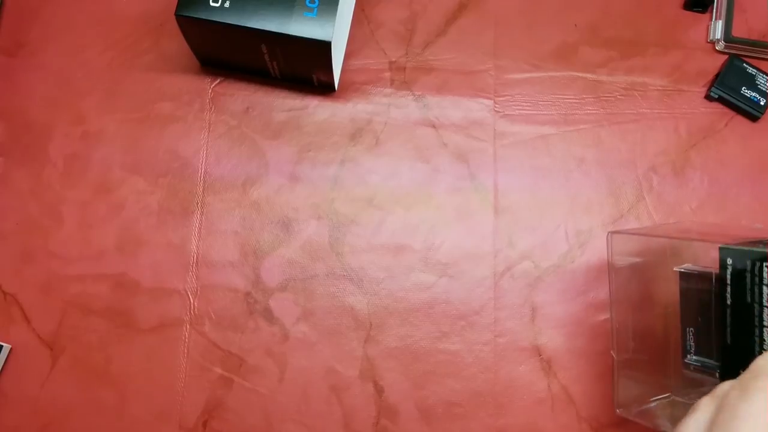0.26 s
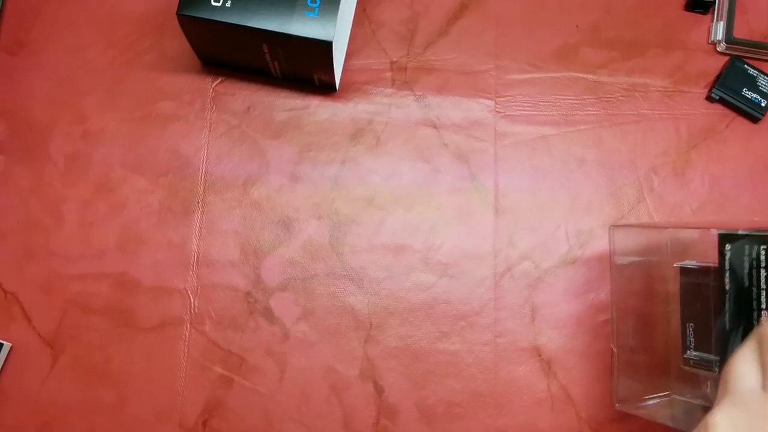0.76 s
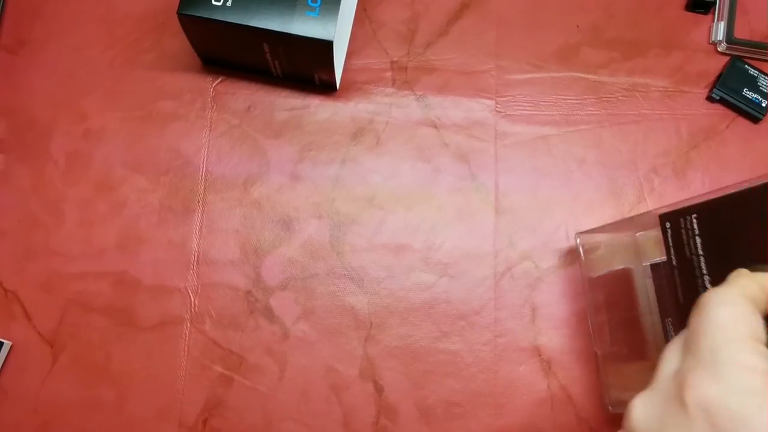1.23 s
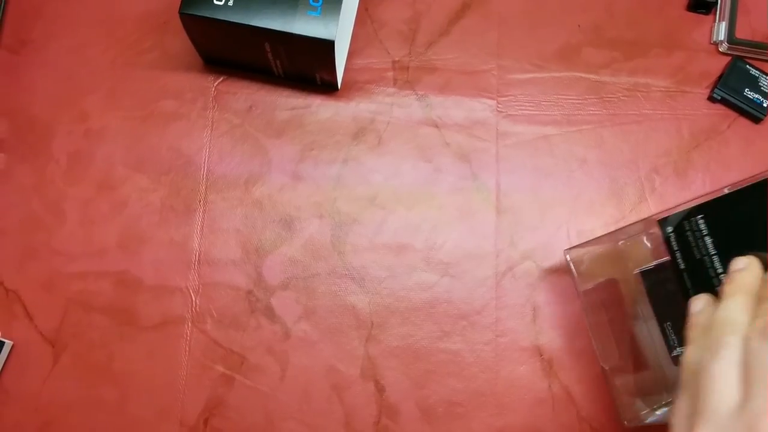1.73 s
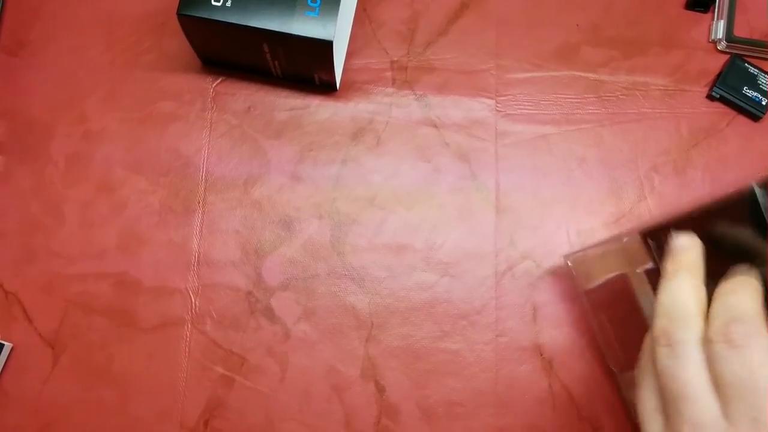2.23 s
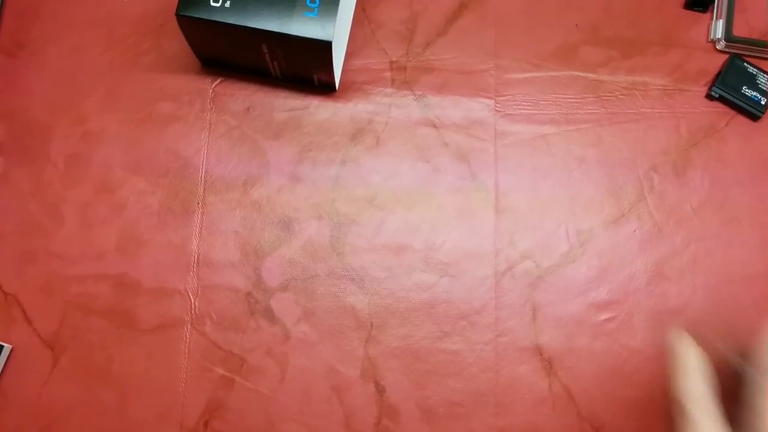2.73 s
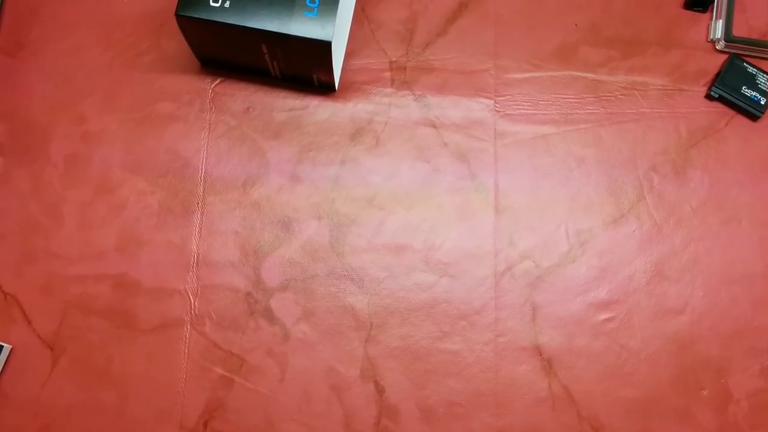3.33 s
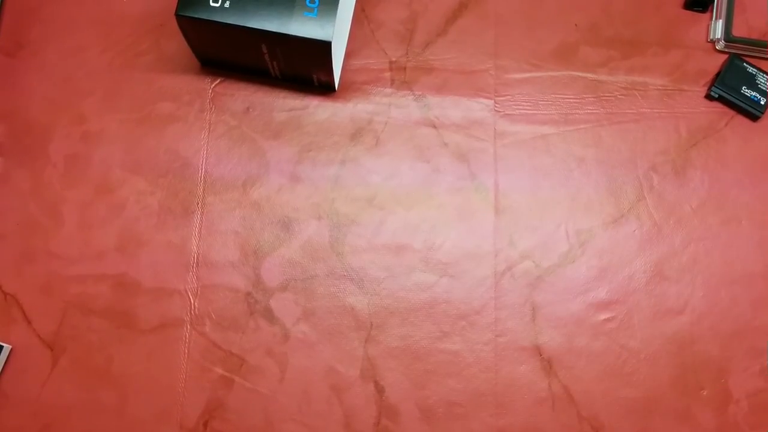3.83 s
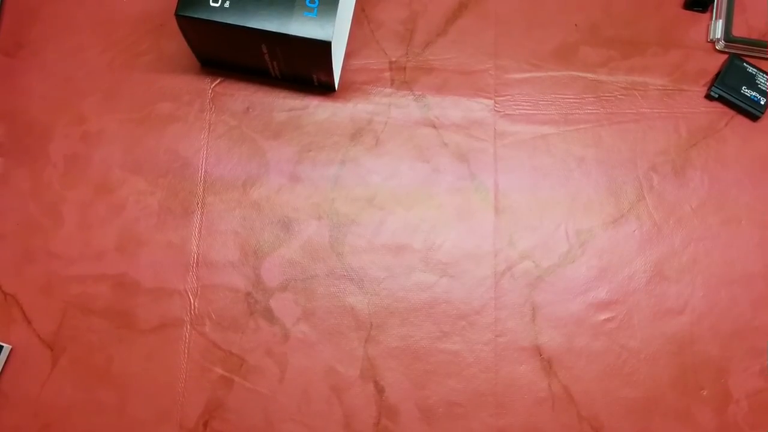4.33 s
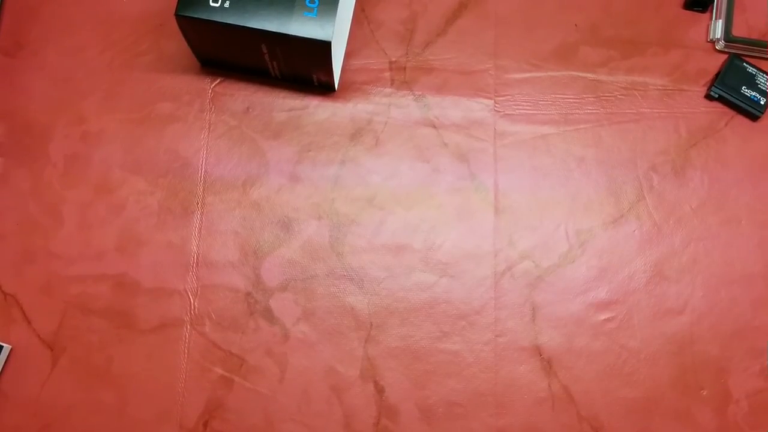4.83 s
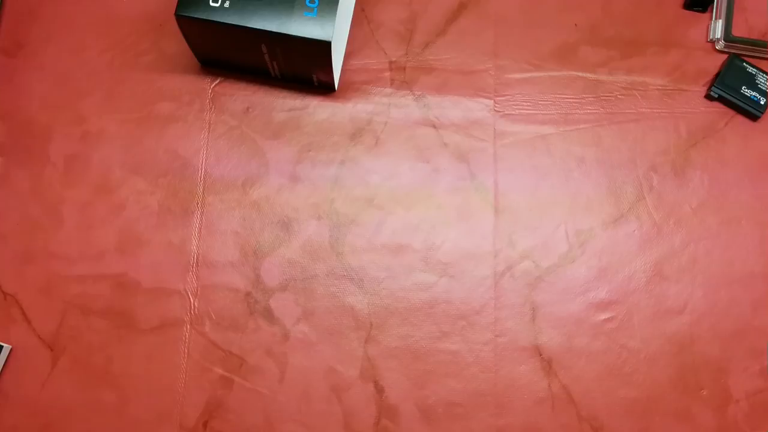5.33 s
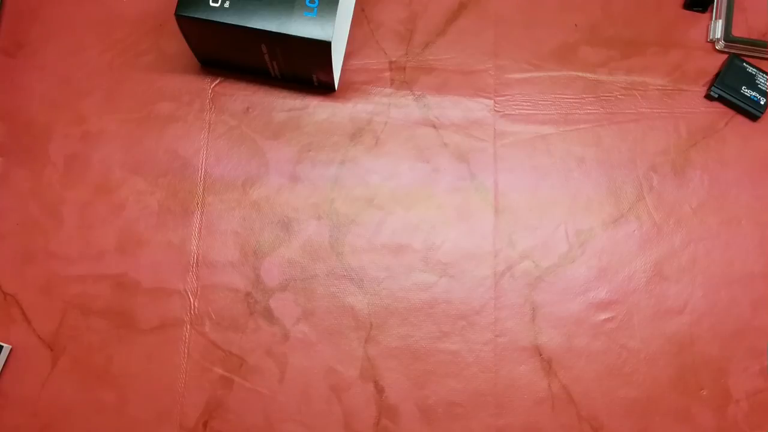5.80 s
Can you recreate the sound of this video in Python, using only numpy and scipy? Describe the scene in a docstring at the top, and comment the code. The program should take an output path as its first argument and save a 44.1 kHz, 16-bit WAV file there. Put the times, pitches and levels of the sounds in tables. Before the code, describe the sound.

Hands pry at a stiff, hollow clear plastic box on a table. Faint rustles and small clicks come first, with a soft table thump, then light crackling. After a sharp knock the snaps grow brighter, bursting into a loud rapid cluster of cracks past the middle. Hollow knocks and small crackles follow. Close microphone, small dry room, quiet tails cut down.

```python
"""Brittle snaps and hollow knocks throughout, over faint rustling: hands pry at a stiff clear plastic box.
Walls buckle and slip in short bursts of tiny impulses that ring tuned resonators, under bright cracks of noise.
The table booms softly when box or hand touches it; fingers rustle as clumped noise, now and then singing.
Decaying noise makes the echo of a small room, and a low murmur fills it.
The recorder's noise gate turns quiet tails down and its peaks are rounded."""
import sys
import numpy as np
from scipy import signal
from scipy.fft import rfft, irfft, next_fast_len
from scipy.io import wavfile
from scipy.ndimage import uniform_filter1d

SR = 44100
rng = np.random.default_rng(int(sys.argv[2]) if len(sys.argv) > 2 else 0)


def how_loud(loudness_db):
    """Turn decibels into a plain amplitude multiplier (0 dB gives 1, 20 dB gives 10)."""
    steps = np.asarray(loudness_db, float) / 20
    return 10 ** steps


def inscribe(sig):
    """Save sig as 16-bit PCM at rate SR to the path in sys.argv[1].

    A 1-D sig is mono; a 2-D sig holds one channel per row.
    Samples are clipped to [-1, 1] before scaling.
    """
    pcm = np.round(np.clip(np.atleast_2d(sig).T, -1, 1) * 32767)
    wavfile.write(sys.argv[1], SR, pcm.astype(np.int16))


N = 267201

# room murmur: (frequency [Hz], relative density [dB per Hz])
MURMUR_COLOUR = [(20, -9.5), (35, -5.5), (60, -5), (120, -1.5), (170, -11), (300, -1), (900, -7.5),
                 (2800, -22.5), (6000, -33.5), (12000, -59.5)]
# decay of the room echo: (frequency [Hz], t60 [s])
ROOM_DECAY = [(150, 0.12), (500, 0.21), (2000, 0.19), (6000, 0.15), (14000, 0.08)]
# box or hand touching the table: (time [s], level [dB])
TABLE_THUMPS = [(0.039, -34), (0.48, -36), (0.728, -53), (0.763, -54.5), (0.901, -42), (0.935, -47),
                (1.005, -47.5), (1.329, -52), (1.49, -18.5), (1.547, -34.5), (1.666, -44), (1.769, -48),
                (1.95, -39), (2.026, -36.5), (2.067, -41.5), (2.265, -32), (2.387, -38.5), (2.544, -41.5),
                (2.683, -48), (3.178, -48), (3.421, -51), (4.595, -26), (5.038, -40), (5.237, -36),
                (5.298, -35.5), (5.348, -42), (5.435, -50), (5.6, -54), (5.67, -49), (5.834, -33),
                (5.9, -48), (6.02, -34.5)]
# modes of the table top: (frequency [Hz], level [dB], t60 [s])
TABLE_MODES = [(73.6, -18.5, 0.041), (91, -12.5, .1), (116.3, 4.5, .1), (155, -20.5, 0.038)]
# fingers shifting on the plastic: (time [s], level [dB])
FINGER_LEVEL = [(0, -57), (.2, -67), (.55, -56), (.9, -54), (1.3, -55), (1.5, -64), (1.9, -57), (2.4, -55),
                (2.85, -65), (3.1, -62), (3.3, -55), (3.75, -58), (4.1, -64), (4.4, -56), (4.9, -57),
                (5.2, -62), (5.5, -50), (5.75, -62), (6.06, -46)]
# colour of the rubbing: (frequency [Hz], relative density [dB per Hz])
RUB_COLOUR = [(88, -34.5), (150, -6.5), (345, 5), (920, -6), (1730, -14), (2110, -13.5), (2620, -13),
              (4470, -30), (8000, -35), (10400, -66), (17600, -120)]
# buckles and slips of the box:
# (time [s], centre of the hollow ring [Hz], hollow level [dB], wall level [dB], crack level [dB])
BOX_SNAPS = [(0.033, 376, -43, -55, -85), (0.095, 740, -55, -50, -29), (0.478, 860, -33, -30, -63),
             (0.58, 730, -84, -57, -74), (0.603, 530, -69, -55, -98), (0.754, 320, -54, -53, -82),
             (0.768, 516, -48, -72, -90), (0.889, 440, -49, -77, -84), (0.93, 420, -48, -59, -82),
             (1.003, 280, -35, -67, -94), (1.037, 490, -45, -59, -95), (1.067, 510, -73, -54, -72),
             (1.247, 530, -62, -47, -67), (1.265, 530, -61, -51, -67), (1.486, 363, -26, -45, -89),
             (1.558, 444, -36, -45, -91), (1.665, 713, -24, -26, -50), (1.675, 775, -28, -23, -38),
             (1.782, 573, -50, -55, -67), (1.817, 660, -30, -30, -70), (1.941, 665, -38, -36, -70),
             (1.974, 485, -34, -35, -74), (1.988, 673, -52, -18, -18), (2.005, 560, -29, -36, -54),
             (2.03, 600, -23, -25, -32), (2.059, 716, -37, -50, -71), (2.178, 680, -41, -44, -76),
             (2.215, 770, -53, -51, -76), (2.26, 600, -27, -27, -40), (2.304, 680, -35, -42, -66),
             (2.363, 560, -32, -31, -67), (2.385, 460, -47, -46, -73), (2.422, 840, -34, -31, -48),
             (2.529, 475, -45, -47, -71), (2.549, 555, -30, -43, -82), (2.673, 604, -44, -54, -86),
             (2.929, 774, -45, -38, -53), (2.97, 660, -46, -32, -53), (3.176, 385, -12, -16, -24),
             (3.195, 410, -40, -41, -63), (3.224, 500, -34, -62, -79), (3.316, 384, -48, -53, -67),
             (3.41, 425, -41, -52, -75), (3.426, 410, -28, -28, -47), (3.445, 430, -26, -41, -71),
             (3.473, 580, -29, -36, -73), (3.489, 480, -46, -39, -67), (3.523, 760, -63, -26, -54),
             (3.562, 480, -56, -55, -60), (3.595, 316, -42, -59, -64), (3.716, 485, -53, -51, -64),
             (3.747, 440, -56, -51, -68), (3.865, 504, -34, -35, -50), (3.907, 477, -45, -54, -69),
             (3.944, 610, -33, -31, -49), (3.966, 440, -36, -14, -28), (3.985, 627, -46, -30, -46),
             (4.175, 477, -51, -37, -61), (4.187, 584, -36, -31, -45), (4.198, 880, -37, -28, -39),
             (4.231, 680, -42, -22, -31), (4.26, 570, -12, -21, -26), (4.29, 430, -46, -38, -65),
             (4.32, 620, -61, -41, -59), (4.474, 664, -57, -33, -52), (4.489, 693, -26, -21, -30),
             (4.511, 550, -34, -31, -58), (4.535, 740, -50, -47, -73), (4.596, 343, 1, -6, -8),
             (4.605, 380, -14, -15, -22), (4.621, 337, -41, -13, -16), (4.636, 470, -5, -5, -12),
             (4.658, 340, 0, -6, -6), (4.682, 399, -12, -18, -35), (4.708, 422, -19, -21, -29),
             (4.752, 635, -35, -23, -49), (4.773, 570, -30, -29, -52), (4.788, 376, -42, -33, -50),
             (4.816, 560, -35, -31, -52), (4.866, 698, -45, -33, -69), (4.957, 670, -56, -49, -78),
             (5.033, 360, -17, -23, -73), (5.05, 383, -19, -40, -64), (5.094, 549, -16, -26, -61),
             (5.135, 613, -57, -49, -81), (5.235, 634, -20, -19, -48), (5.248, 311, -12, -20, -68),
             (5.271, 700, -16, -25, -64), (5.28, 750, -15, -11, -48), (5.29, 740, -16, -38, -47),
             (5.31, 384, -17, -28, -43), (5.323, 382, -20, -27, -53), (5.336, 510, -22, -27, -41),
             (5.355, 389, -42, -41, -52), (5.384, 480, -46, -44, -67), (5.419, 580, -41, -60, -77),
             (5.525, 360, -33, -34, -73), (5.556, 299, -29, -35, -73), (5.596, 337, -34, -51, -77),
             (5.667, 620, -34, -30, -67), (5.755, 650, -57, -47, -80), (5.813, 630, -33, -33, -60),
             (5.828, 360, -26, -26, -26), (5.848, 410, -32, -22, -30), (5.883, 363, -25, -19, -23),
             (5.895, 367, -45, -22, -27), (5.937, 437, -44, -36, -54), (5.961, 700, -41, -33, -45),
             (5.973, 720, -38, -30, -34), (6.012, 514, -27, -28, -41), (6.032, 630, -32, -35, -65)]
# the box as a hollow body: (frequency [Hz], level [dB], t60 [s])
HOLLOW_MODES = [(290.3, -16.5, 0.091), (334, 0, 0.093), (340.8, 0, 0.065), (410, -2, 0.034),
                (449, -10, 0.043), (530, -0.5, 0.027), (617.4, 4.1, .065), (680, 2, 0.04), (802, 2.8, .06),
                (904, 5, 0.054)]
# damped hollow modes that blur together: (band centre [Hz], level [dB])
BODY_BANDS = [(300, -0.5), (450, -3.5), (680, -2.5)]
# bending modes of the walls: (frequency [Hz], level [dB], t60 [s])
WALL_MODES = [(958.6, 1.5, 0.061), (1066, -4.5, .055), (1307, -3.55, .055), (1400, -2.5, 0.037),
              (1450, -1.5, 0.026), (1681, 1.5, 0.055), (1870, -0.5, 0.058), (1990, 0.5, 0.034),
              (2300, 2.5, .045), (2590, -2.5, .045), (2944, -4.5, 0.028), (3170, -6.5, 0.054),
              (3380, -7, 0.051), (3700, -20.5, 0.012), (4160, -10.5, 0.071), (4547, -11, 0.081)]
# wall modes too dense to tell apart: (band centre [Hz], level [dB])
SHIMMER_BANDS = [(1000, -3), (1500, -1), (2200, -0.5), (3200, 1.5), (4500, -2)]
# colour of the bare crack: (frequency [Hz], relative density [dB per Hz])
CRACK_COLOUR = [(2500, -2.5), (4000, 9), (5500, 4.65), (7500, 1.5), (10000, -7.5), (13000, -15),
                (16000, -31)]


def rms_one(x):
    """Scale to rms 1."""
    return x / np.sqrt(np.mean(x ** 2) + 1e-20)


def at_hz(points, hz):
    """Read a table on a log-frequency axis."""
    points = np.array(points)
    return np.interp(np.log(hz), np.log(points[:, 0]), points[:, 1])


def coloured(x, spectrum):
    """Give a signal the colour of a spectrum; rms 1."""
    size = next_fast_len(len(x))
    hz = np.maximum(np.fft.rfftfreq(size, 1 / SR), 1)
    tinted = rfft(x, size) * how_loud(at_hz(spectrum, hz))
    return rms_one(irfft(tinted, size)[:len(x)])


def between(x, low_hz, high_hz):
    """Steep band-pass."""
    return signal.sosfilt(signal.butter(3, [low_hz, high_hz], "band", fs=SR, output="sos"), x)


def ring(force, hz, t60):
    """A damped resonator: a unit click sets a sine of height 1 ringing."""
    radius = how_loud(-60 / (t60 * SR))
    turn = 2 * np.pi * hz / SR
    # the tiny constant keeps the filter out of denormals
    return signal.lfilter([0, np.sin(turn)], [1, -2 * radius * np.cos(turn), radius ** 2], force + 1e-18)


def lay(times, shapes):
    """Place one short shape at each time."""
    out = np.zeros(N + shapes.shape[1])
    for time, shape in zip(times, shapes):
        at = round(time * SR)
        out[at:at + len(shape)] += shape
    return out[:N]


def grains(shape, spread_db):
    """Dense tiny slips: random sign, a few far larger than the rest."""
    return rng.standard_normal(shape) * how_loud(spread_db * np.minimum(rng.exponential(1, shape), 5))


def struck(modes, times, forces, db, spread_db):
    """Every force drives every mode, with a strength and sign of its own; db is events x modes."""
    shape = len(times), len(modes)
    strength = how_loud(np.array(modes)[:, 1] + db + spread_db * rng.standard_normal(shape))
    share = strength * rng.choice([-1, 1], shape)
    out = np.zeros(N)
    for k, (hz, _, t60) in enumerate(modes):
        out += ring(lay(times, forces * share[:, [k]]), hz, t60)
    return out


def swell(t, length, fade_s):
    """The burst's rise and fall, prolonged by a fading ring; height 1."""
    burst = t / length * np.exp(-t / length)
    shape = signal.lfilter([1], [1, -np.exp(-1 / (fade_s * SR))], burst)
    return shape / shape.max(axis=1, keepdims=True)


def grit(ticks_per_s, tick_s, steady):
    """Steady noise plus uneven ticks of noise, each dying fast."""
    ticks = (rng.random(N) < ticks_per_s / SR) * how_loud(4.8 * rng.standard_normal(N))
    flare = signal.lfilter([1], [1, -np.exp(-1 / (tick_s * SR))], ticks)
    return rng.standard_normal(N) * (steady + flare)


def blurred(bands, times, db, shapes):
    """Dense modes heard as bands of grit, each played by every burst; db is events x bands."""
    rough = grit(ticks_per_s=450.0, tick_s=0.0013, steady=1.4)
    gains = how_loud(np.array(bands)[:, 1] + db + 1.8 * rng.standard_normal((len(times), len(bands))))
    out = np.zeros(N)
    for k, (hz, _) in enumerate(bands):
        out += rms_one(between(rough, hz / 1.235, hz * 1.231)) * lay(times, gains[:, [k]] * shapes)
    return out


def murmur(level_db=-65.5):
    """Steady noise in the colour of the room's air."""
    return how_loud(level_db) * coloured(rng.standard_normal(N), MURMUR_COLOUR)


def room(x, onset_s=0.0016):
    """The echo is noise that fades in fast and dies band by band; its energy is 1."""
    t = np.arange(SR // 2) / SR
    echo = np.zeros(len(t))
    edges = 100 * 2 ** np.arange(0, 7.6, .5)   # half octaves [Hz]
    for low, high in zip(edges, edges[1:]):
        band_pass = signal.butter(2, [low, high], "band", fs=SR, output="sos")
        band = signal.sosfilt(band_pass, rng.standard_normal(len(t)))
        echo += band * how_loud(-60 * t / at_hz(ROOM_DECAY, np.sqrt(low * high)))
    echo *= 1 - np.exp(-(t / onset_s) ** 2)
    return signal.fftconvolve(x, echo / np.sqrt(np.sum(echo ** 2)))[:N]


def table(contact_s=0.0016):
    """A soft push sets the modes of the table top booming."""
    times, db = np.transpose(TABLE_THUMPS)
    t = np.arange(1000) / SR
    push = t * np.exp(-t / contact_s * np.e)
    pushes = np.tile(push / push.sum(), (len(times), 1))
    boom = struck(TABLE_MODES, times, pushes, db[:, None] + 0.5, spread_db=1.5)
    return between(boom, 55, 600)


def settling(below_wall_db=19.5, flare_s=.004, settle_s=.026):
    """Level of the walls' creaking, which flares with each snap and dies after it."""
    times, _, _, wall_db, _ = np.transpose(BOX_SNAPS)
    lead_s = .05
    t = np.arange(SR // 2) / SR - lead_s
    shape = np.where(t < 0, np.exp(t / flare_s), np.exp(-t / settle_s))
    return lay(np.maximum(times - lead_s, 0), how_loud(wall_db - below_wall_db)[:, None] * shape)


def humming(per_mode_per_s=3.5, swell_s=.025):
    """Now and then the rub makes one mode of the box sing briefly; rms 1."""
    out = np.zeros(N)
    fall = np.exp(-1 / (swell_s * SR))
    for hz, _, t60 in HOLLOW_MODES + WALL_MODES[:13]:
        starts = (rng.random(N) < per_mode_per_s / SR) * how_loud(3.0 * rng.standard_normal(N))
        swells = signal.lfilter([1], [1, -2 * fall, fall ** 2], starts + 1e-18)
        song = rms_one(ring(swells * rng.standard_normal(N), hz, t60))
        out += how_loud(at_hz(RUB_COLOUR, hz) / 2) * song
    return rms_one(out)


def rustle(clumps_per_s=80.0, clump_s=0.014, rub_db=-3.5, hum_db=-5.0):
    """Fingers on plastic: faint slips in small clumps over a steady rub, with singing modes."""
    starts = (rng.random(N) < clumps_per_s / SR) * how_loud(2 * rng.standard_normal(N))
    fall = np.exp(-1 / (clump_s * SR))
    rise_and_fall = signal.lfilter([(1 - fall) ** 2], [1, -2 * fall, fall ** 2], starts)
    clumps = .9 + clump_s * SR * rise_and_fall
    rub = rms_one(clumps) * coloured(grains(N, spread_db=2.0), RUB_COLOUR)
    times, db = np.transpose(FINGER_LEVEL)
    fingers = how_loud(np.interp(np.arange(N) / SR, times, db))
    return (how_loud(rub_db) * fingers + settling()) * rub + how_loud(hum_db) * fingers * humming()


def snaps_and_afterslips(count=2, gap_scale_s=.011, loss_db=19.0, fade_db_per_s=300.0, duller_db=10.0):
    """Every snap leaves strain that lets go in a few weaker, duller slips; same columns as the snaps."""
    rows = np.array(BOX_SNAPS)
    luck = rng.exponential(1, (len(rows), 2 * count))
    delay = np.cumsum(gap_scale_s * (.3 + luck[:, :count]), axis=1).ravel()
    lucky_db = 3.0 * np.minimum(luck[:, count:].ravel(), 3)
    change_db = lucky_db - loss_db - fade_db_per_s * delay
    changes = np.transpose([delay, np.zeros_like(delay), change_db, change_db, change_db - duller_db])
    after = np.repeat(rows, count, axis=0) + changes
    after[:, 0] = np.minimum(after[:, 0], (N - 1) / SR)
    return np.vstack([rows, after])


def burst_length(hollow_db, wall_db, crack_db):
    """Rise time [s]: longer the softer the burst (wall above crack) and the fainter it is."""
    length = .001 + 3e-5 * (wall_db - crack_db)
    length += 5e-4 * np.maximum(-40 - np.maximum(hollow_db, wall_db), 0)
    return np.clip(length, 2e-4, .03)


def slip_bursts(t, length, main_slip=.8):
    """Tiny slips swell and die around one main slip, which holds a set share of the force."""
    slips = grains((len(length), len(t)), spread_db=2.0) * t / length * np.exp(-t / length)
    slips /= np.sqrt(np.sum(slips ** 2, axis=1, keepdims=True))
    largest = np.arange(len(t)) == np.round(length * SR)
    slips = np.sqrt(1 - main_slip ** 2) * slips + main_slip * largest
    # a long burst keeps feeding a ring that already dies
    return slips * np.sqrt(1 + length / 0.012)


def box(span_s=.14, fizz_below_db=22.0, fizz_s=.016):
    """Bursts of slips ring the hollow and the walls, and are heard bare as bright cracks with a fizz."""
    columns = np.transpose(snaps_and_afterslips())[:, :, None]
    times, centre_hz, hollow_db, wall_db, crack_db = columns
    times = times[:, 0]
    length = burst_length(hollow_db, wall_db, crack_db)
    t = np.arange(round(span_s * SR)) / SR
    slips = slip_bursts(t, length)

    # how the box is held and bent decides which hollow modes speak
    away = np.log2(np.array(HOLLOW_MODES)[:, 0] / centre_hz)   # octaves
    hollow = struck(HOLLOW_MODES, times, slips, hollow_db - 6.5 - 39.0 * away ** 2, spread_db=2.2)
    away = np.log2(np.array(BODY_BANDS)[:, 0] / centre_hz)
    body_db = hollow_db - 8.5 - 4.5 * away ** 2
    hollow += blurred(BODY_BANDS, times, body_db, swell(t, length, fade_s=.009))

    # a soft contact, with little crack, also leaves the upper wall modes weak
    tilt_db = .2 * (crack_db - wall_db + 9.5)   # per octave
    octaves = np.log2(np.array(WALL_MODES)[:, 0] / 1500)
    walls = struck(WALL_MODES, times, slips, wall_db - 14.0 + tilt_db * octaves, spread_db=2.6)
    octaves = np.log2(np.array(SHIMMER_BANDS)[:, 0] / 1500)
    shimmer_db = wall_db - 8.5 + tilt_db * octaves
    walls += blurred(SHIMMER_BANDS, times, shimmer_db, swell(t, length, fade_s=0.0063))

    # fine crackle trails each crack
    crack_shape = swell(t, length, fade_s=.004) + how_loud(-fizz_below_db) * swell(t, length, fizz_s)
    crack = coloured(grit(ticks_per_s=600.0, tick_s=0.0009, steady=0.7), CRACK_COLOUR)
    crack *= lay(times, how_loud(crack_db) * crack_shape)
    return between(hollow, 265, 1100) + between(walls, 750, 4600) + crack


def scene(echo_db=-14.5):
    """Box and table with their echo, and the rustle, over the room's murmur."""
    near = box() + table()
    return (near + how_loud(echo_db) * room(near) + rustle() + murmur())[None]


def gate(x, listen_s=.012, glide_s=.005, knee_at_db=-51, knee_db=2.0, deepest_cut_db=15.0):
    """Quiet moments are turned down; the level is read slightly ahead, so attacks pass."""
    power = np.abs(uniform_filter1d(x ** 2, round(listen_s * SR)))
    level_db = 10 * np.log10(power + 1e-12)
    above_knee = np.clip((level_db - knee_at_db) / knee_db, -50, 50)
    cut_db = deepest_cut_db / (1 + 2 * np.exp(above_knee))
    return x * how_loud(-uniform_filter1d(cut_db, round(glide_s * SR)))


def roll_off(x):
    """The treble ends steeply here."""
    return signal.sosfilt(signal.butter(12, 17060, fs=SR, output="sos"), x)


def record(dry):
    """Gate and rounded peaks, then a little converter hiss and a constant offset."""
    rounded = 0.78 * np.tanh(gate(dry) / 1.009)
    hiss = how_loud(-78) * between(rng.standard_normal(dry.shape), 30, 14000)
    mix = rounded + hiss - 4e-4
    return roll_off(mix)


dry = scene()
out = record(dry)
inscribe(out)
```